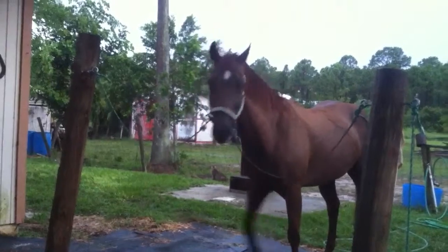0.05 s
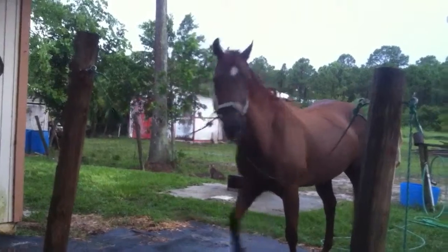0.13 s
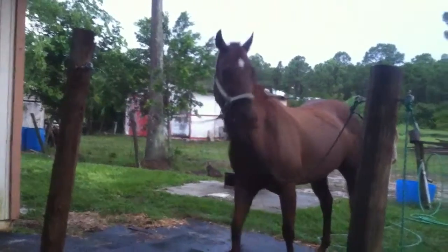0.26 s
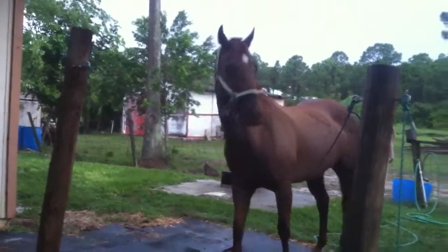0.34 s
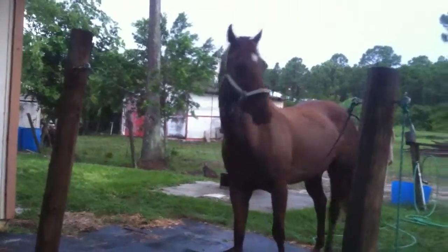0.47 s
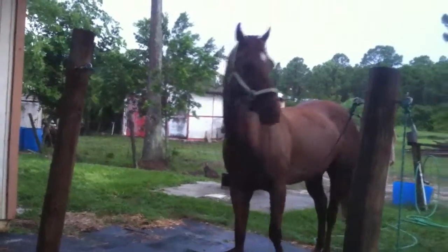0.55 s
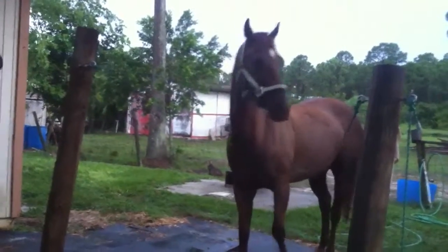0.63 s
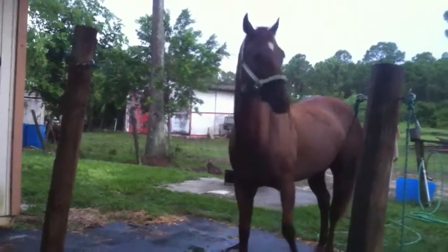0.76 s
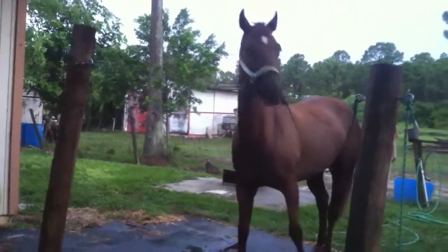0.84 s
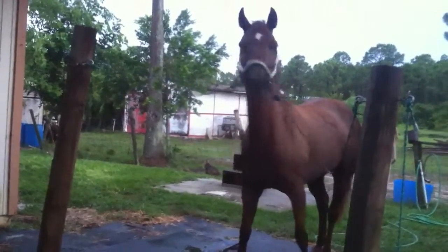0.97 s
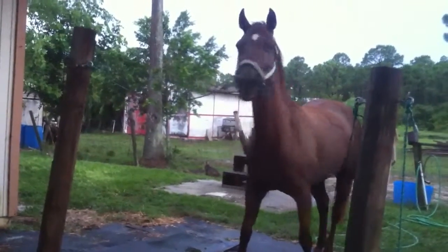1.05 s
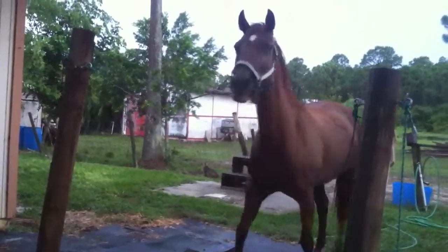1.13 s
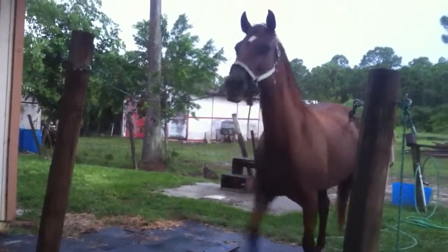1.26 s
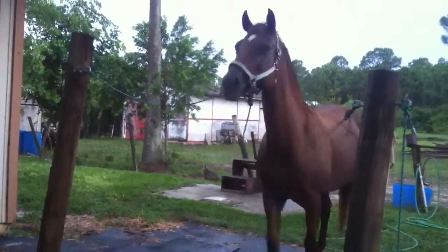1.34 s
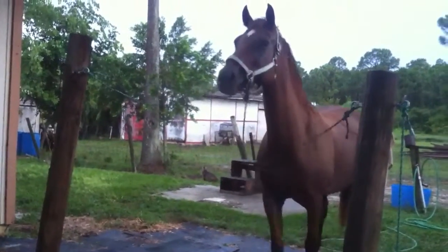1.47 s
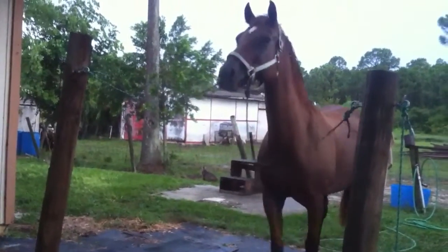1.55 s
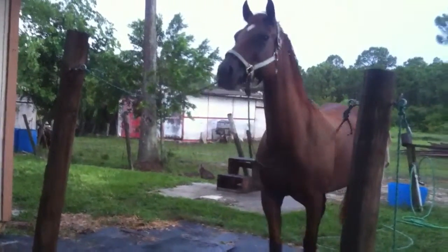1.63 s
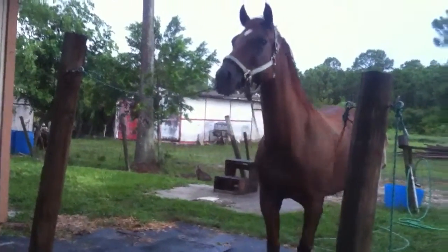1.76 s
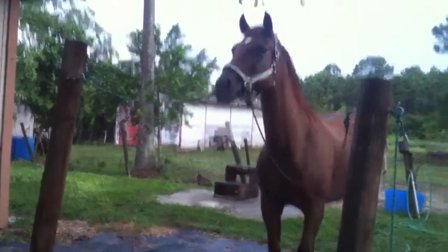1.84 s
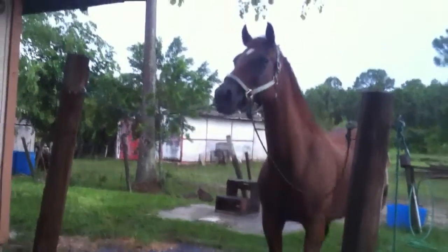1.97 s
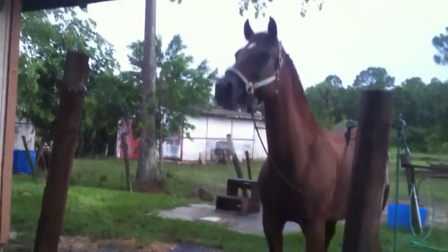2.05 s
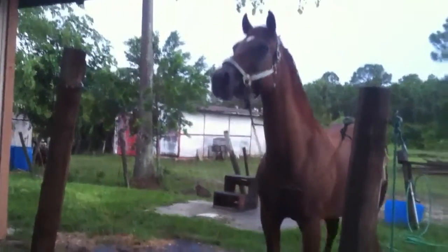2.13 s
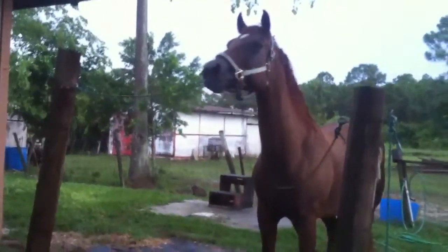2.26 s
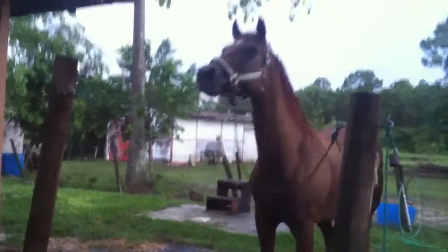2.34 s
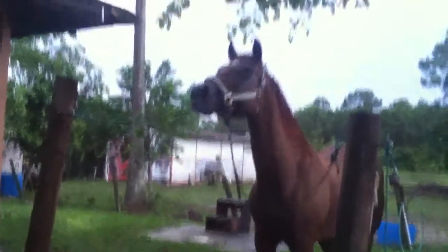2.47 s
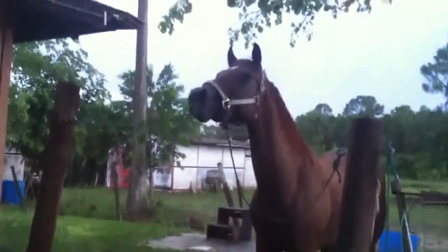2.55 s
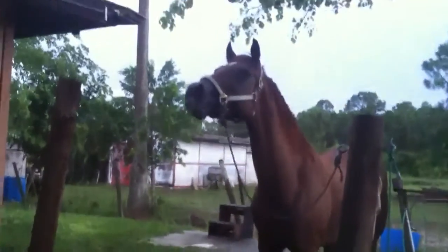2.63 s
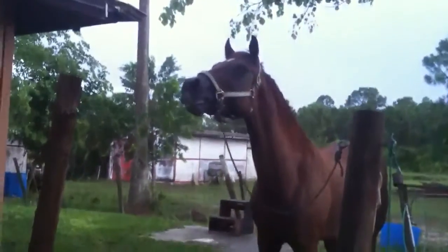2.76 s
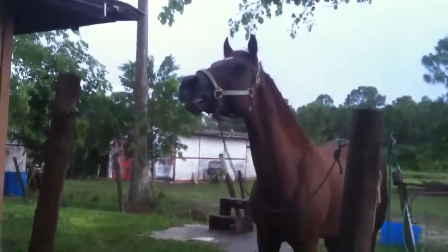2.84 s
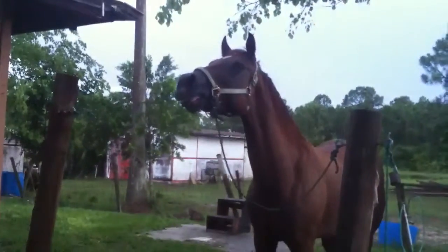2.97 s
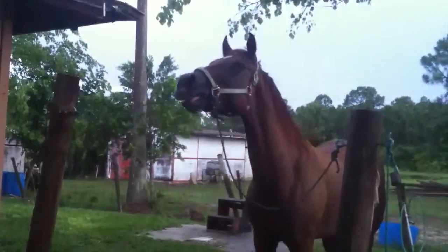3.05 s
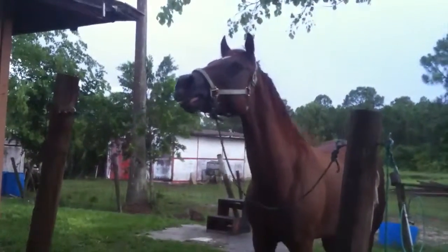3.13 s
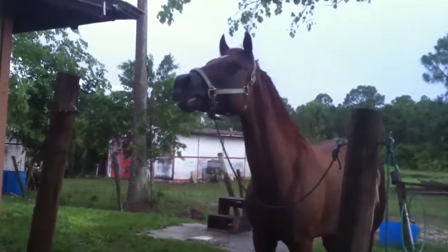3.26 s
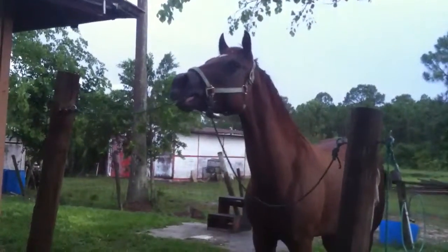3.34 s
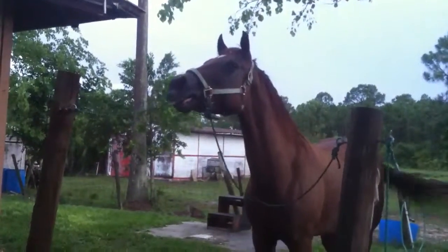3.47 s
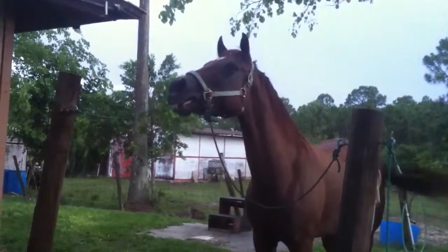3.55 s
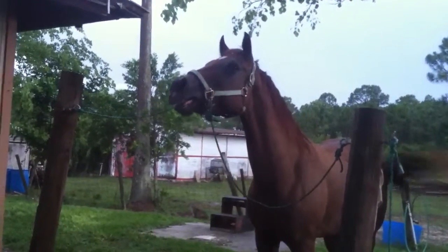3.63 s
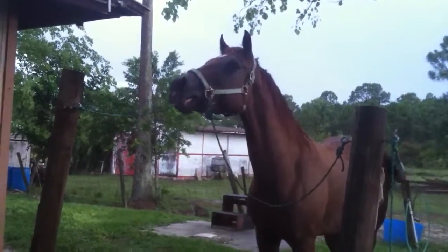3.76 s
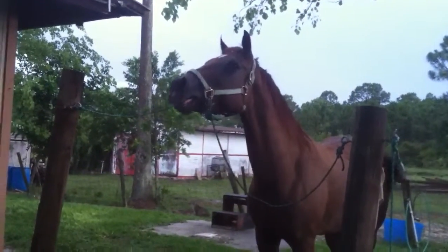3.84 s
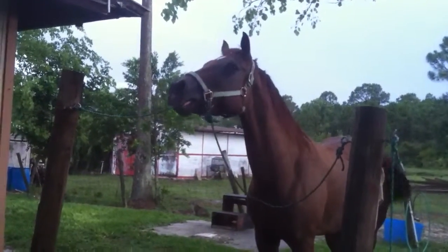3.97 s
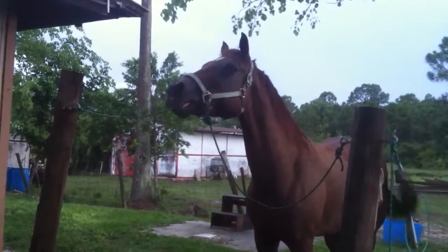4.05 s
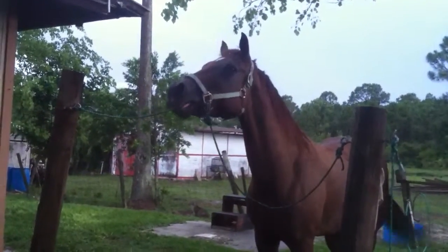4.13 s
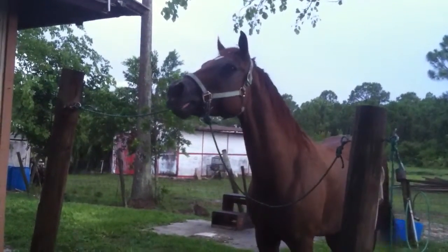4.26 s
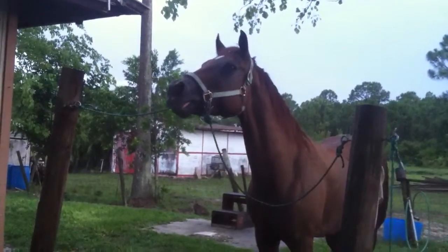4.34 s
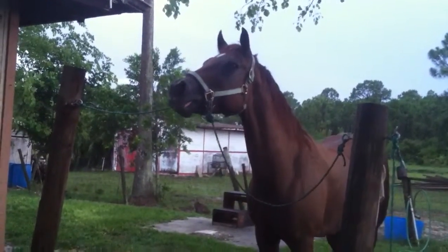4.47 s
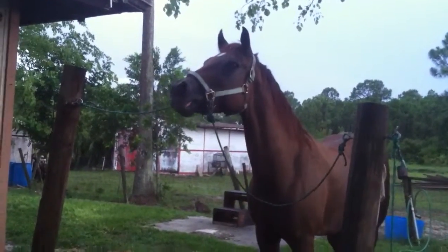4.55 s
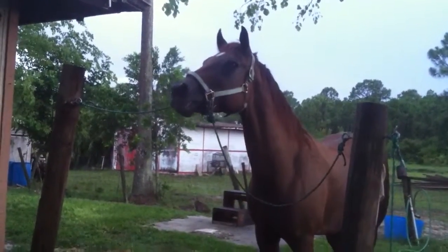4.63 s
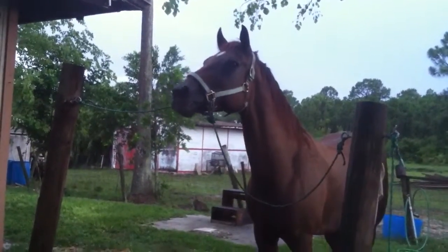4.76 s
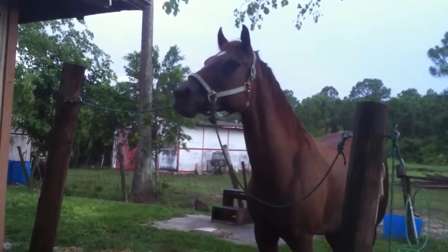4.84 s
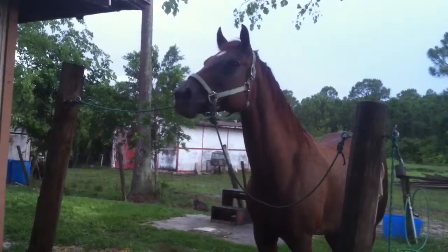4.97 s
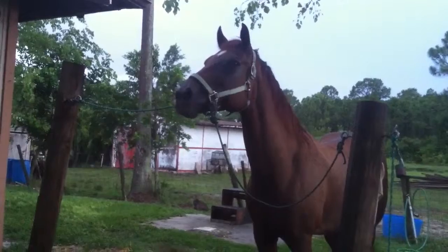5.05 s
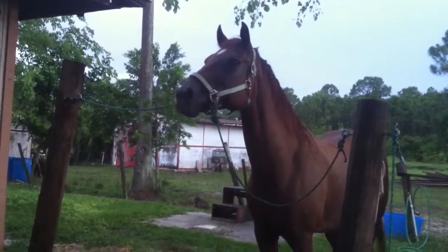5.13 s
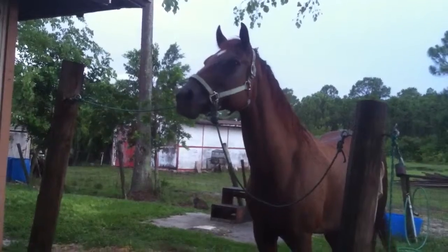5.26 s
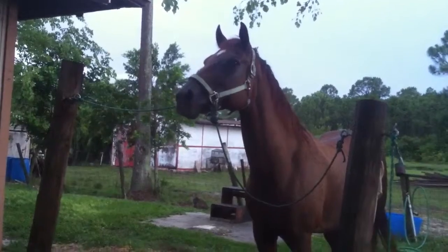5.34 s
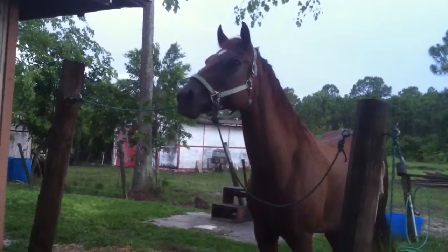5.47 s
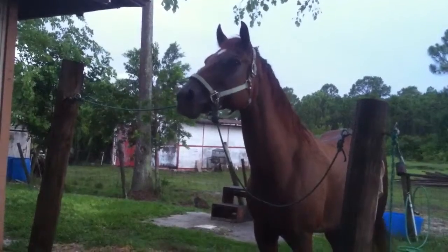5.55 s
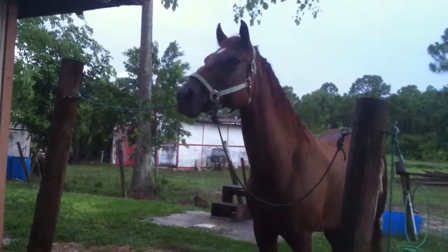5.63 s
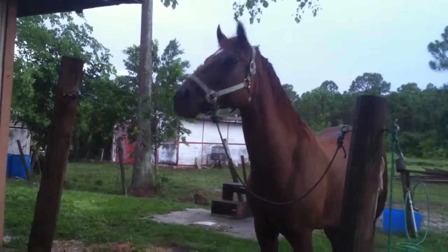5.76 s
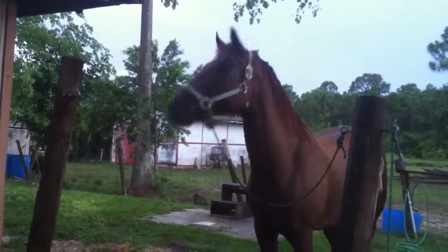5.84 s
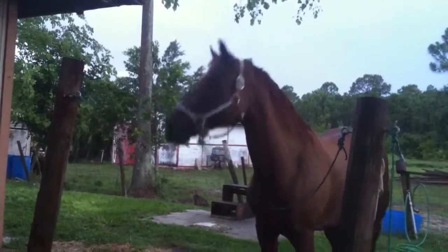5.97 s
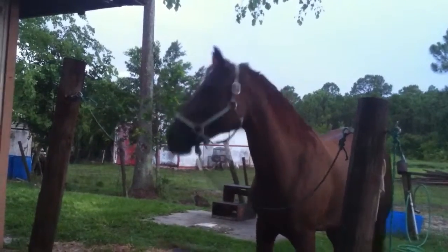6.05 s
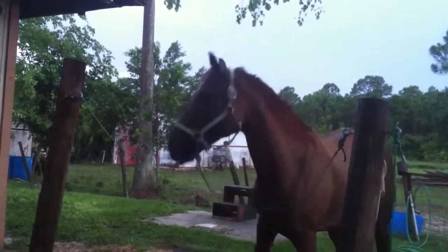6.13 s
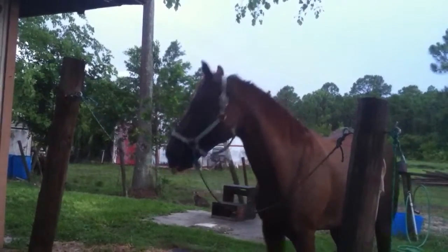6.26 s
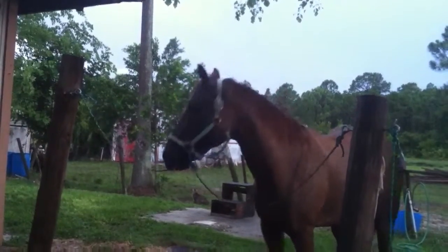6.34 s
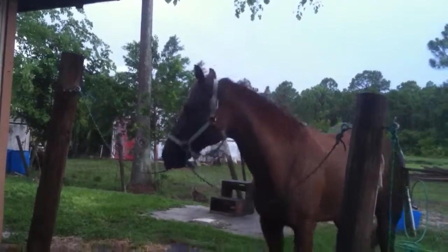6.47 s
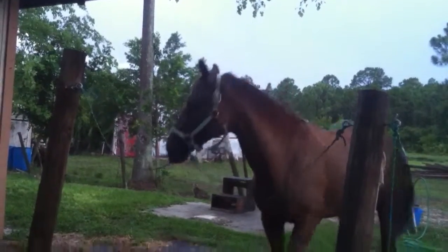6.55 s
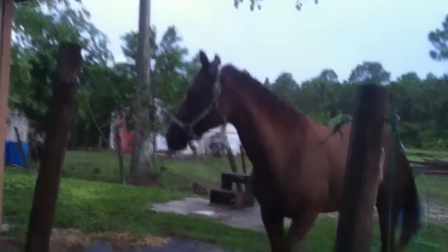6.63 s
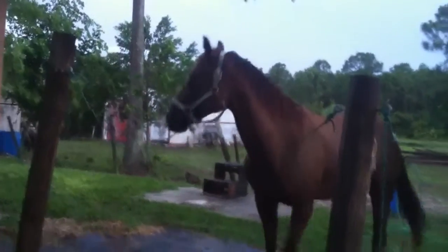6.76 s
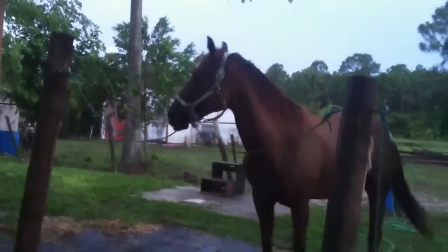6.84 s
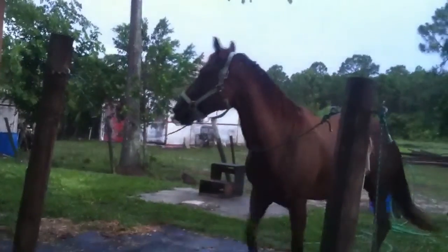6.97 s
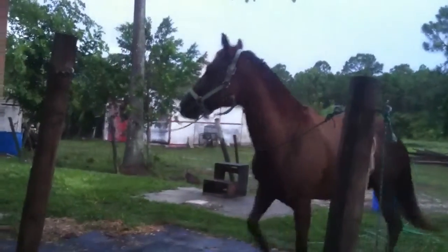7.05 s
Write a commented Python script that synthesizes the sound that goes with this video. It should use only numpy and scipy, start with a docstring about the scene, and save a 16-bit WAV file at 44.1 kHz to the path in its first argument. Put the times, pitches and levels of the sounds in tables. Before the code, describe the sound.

Faint frog and insect chorus, a few dull hoof thuds, then a piercing, quavering horse whinny ending in a rattling nicker, and later hoof steps.

```python
"""A far chorus of frogs and insects and a few hoof thuds, then a horse whinnies once, a few metres from the mic
beside a barn: a rising whistle breaks into a shaking two-voiced call and sinks into a hoarse nicker.
The high voice is a bent sine with overtones; the low voice is folds whose closures and air puffs ring throat and nose.
Hooves are knocks, decaying modes and scuffed noise; close clicks are snaps with thumps; the chorus is banded noise.
Crickets and birds are gliding tones; insects rasp in noise surges; barn echoes and a tree tail follow the horse."""
import sys
import numpy as np
from scipy import signal
from scipy.fft import rfft, irfft
from scipy.io import wavfile
from scipy.ndimage import uniform_filter1d

SR = 44100
rng = np.random.default_rng(int(sys.argv[2]) if len(sys.argv) > 2 else 0)


def wav_record(signal):
    """Record a signal, one row per channel, as 16-bit PCM in the file named by sys.argv[1]."""
    frames = np.transpose(np.atleast_2d(signal))
    bounded = np.clip(frames, -1, 1)
    # unit amplitude maps onto the largest positive 16-bit level
    quanta = np.round(bounded * 32767).astype(np.int16)
    wavfile.write(sys.argv[1], SR, quanta)


N = 313110
TIME = np.arange(N) / SR

# level of the whistle, rising and broken: (time [s], level [dB])
WHISTLE_LEVEL = [(2.2, -59.5), (2.238, -51), (2.248, -38.5), (2.275, -37.5), (2.29, -32.5), (2.318, -35.5),
                 (2.335, -27), (2.357, -34), (2.368, -23.5), (2.392, -18.5), (2.41, -22), (2.445, -25.5),
                 (2.47, -17.5), (2.52, -13.5), (2.8, -15), (3.1, -17), (3.35, -17.5), (3.65, -16),
                 (3.94, -24.5), (4.05, -33), (4.33, -54)]
# how far the high voice has broken up: (time [s], roughness [0-1])
ROUGHNESS = [(2.2, 0.29), (2.39, 0), (2.428, 0.33), (2.46, 0.28), (2.5, 0.57), (2.8, 0.77), (3.5, 0.75),
             (3.8, 0.84)]
# shakes of the call, about seven a second, levels before the dips: (time [s], low voice level [dB],
# throat level [dB], nostril hiss level [dB], half length [s], pitch sag [Hz])
SHAKES = [(2.562, -38, -27, -23.5, .038, 0), (2.684, -29.5, -26.5, -20.5, .04, 0),
          (2.814, -26, -26.5, -20, .042, 0), (2.951, -26, -27.5, -22, .045, 0),
          (3.095, -27, -26.5, -21.5, .043, 0), (3.237, -24.5, -26, -21, .047, 0),
          (3.38, -23.5, -26, -22.5, .045, 35), (3.522, -24, -25.5, -23, 0.0466, 58),
          (3.657, -24, -24.5, -22.5, 0.0452, 100), (3.797, -23, -24.5, -23.5, 0.0361, 105),
          (3.937, -22, -22.5, -24.5, 0.0366, -0.5), (4.057, -29.5, -26, -32.5, 0.0387, 45),
          (4.196, -32.5, -23.5, -31, 0.028, 15)]

# the rising whistle cracks, then jumps to its top note
CRACK_S, BREAK_S, JUMP_S = 2.434, 2.487, 0.011
# the folds tire, then the call sinks into a nicker
TIRE_S, NICKER_S, NICKER_ONSET_S = 3.26, 3.93, .12
# from here the droop between shakes gives way to a sag just after each push
SAGGING_S, SAGGING_ONSET_S = 3.25, .15


def undb(db):
    """Decibels to gain."""
    return 10 ** (np.asarray(db) / 20)


def unit(x):
    """Scale to rms 1."""
    return x / np.sqrt(np.mean(x ** 2) + 1e-18)


def steady(x):
    """Hold the rms at 1 over a fifth of a second."""
    return x / np.sqrt(uniform_filter1d(x ** 2, size=8820) + 1e-12)


def curve(rows):
    """Join (time [s], value) rows by straight lines."""
    return np.interp(TIME, *np.transpose(rows))


def window(start, end, fade):
    """1 between two times, with sloping edges inside them."""
    return np.clip(np.minimum(TIME - start, end - TIME) / fade, 0, 1)


def ramp(start, length):
    """0 before a time, rising to 1 over a length."""
    return np.clip((TIME - start) / length, 0, 1)


def swell(at, rise, fall, squareness=2):
    """A smooth hump of height 1."""
    return np.exp(-np.minimum(np.abs((TIME - at) / np.where(TIME < at, rise, fall)), 5) ** squareness)


def loudness(rows):
    """Gain from (time [s], level [dB]) rows, silent outside them."""
    return undb(curve(rows)) * window(rows[0][0], rows[-1][0], 0.005)


def delayed(control, lag):
    """A control that runs lag seconds late."""
    return np.interp(TIME - lag, TIME, control)


def noise():
    """White noise."""
    return rng.standard_normal(N)


def walk(rate):
    """Smooth random motion of spread 1, up to about rate Hz."""
    hz = np.arange(N // 2 + 1) * SR / N
    return unit(irfft(rfft(noise()) * np.exp(-(hz / rate) ** 2 / 2), N))


def turning(hz):
    """Phase of an oscillator that follows a pitch."""
    return 2 * np.pi * np.cumsum(hz) / SR


def colour(x, points):
    """Filter by a (frequency [Hz], level [dB]) spectrum that falls away beyond its ends."""
    hz, db = np.transpose(points)
    octave = np.log2(np.maximum(np.arange(N // 2 + 1) * SR / N, 1))
    beyond = np.abs(octave - np.clip(octave, np.log2(hz[0]), np.log2(hz[-1])))
    gain = undb(np.interp(octave, np.log2(hz), db) - 89 * beyond)
    return irfft(rfft(x) * gain, N)


def resonate(x, hz, width):
    """A steep resonance of gain 1: the same peak filter twice."""
    b, a = signal.iirpeak(hz, hz / width, fs=SR)
    return signal.lfilter(b, a, signal.lfilter(b, a, x))


def ring(x, modes):
    """Drive a set of (frequency [Hz], width [Hz], level [dB]) resonances of alternating sign."""
    return sum((-1) ** k * undb(db) * resonate(x, hz, width) for k, (hz, width, db) in enumerate(modes))


def lowpass(x, hz):
    """Second-order low-pass."""
    return signal.sosfilt(signal.butter(2, min(hz, SR / 2 - 1), fs=SR, output="sos"), x)


def decay(t, t60):
    """A fall of 60 dB in t60 seconds."""
    return np.exp(-np.log(1000) * t / t60)


def add(out, start, sound):
    """Mix a short sound in at a time."""
    i = max(int(start * SR), 0)
    out[i:i + len(sound)] += sound[:max(N - i, 0)]


def chorus(low_db=0.73, high_db=-55.5, air_db=-57.0):
    """Countless far frogs and insects blur into two bands of noise over soft outdoor air."""
    # spectra of the two bands and of the air: (frequency [Hz], level [dB])
    low_colour = [(700, -34), (1150, -34.5), (1450, 3.5), (1650, 3), (1900, -0.5), (2300, -7),
                  (2900, -18.5), (3600, -25)]
    high_colour = [(2000, -36), (2800, -8.5), (3500, -5.5), (4050, 2), (4450, -6), (4900, -25),
                   (5900, -25.5), (7500, -23.5), (8500, -22.5), (9200, -28), (9700, -56), (13000, -48)]
    air_colour = [(25, 1), (60, -9), (120, -3.5), (280, 0.5), (480, -4.5), (750, -11.5), (1300, -6),
                  (3000, -12), (10000, -34)]
    # swell of the low band, before its trim and the lull: (time [s], level [dB])
    low_level = np.vstack([ [(0.0, -48), (0.17, -59.5), (0.17, -56.5), (0.66, -48.5), (0.75, -62.5),
                 (0.94, -54), (1.63, -51), (1.78, -60), (1.82, -56.5), (2.15, -49)], [(4.5, -55),
                 (4.51, -56), (5.2, -51.5), (5.75, -53.5), (5.85, -49), (5.97, -56.5), (6.14, -48),
                 (6.31, -58.5), (6.5, -52), (6.7, -50)], ])
    # nearer groups of callers: (frequency [Hz], width [Hz], level against the whole chorus [dB])
    callers = [(1615, 160, -15.5), (1673, 81, -4.5), (1828, 35, -9.5), (3490, 520, -8), (3730, 490, -8),
               (4000, 860, -14.5)]
    lull = ramp(6.68, 0.076)  # the chorus ebbs at the end
    low_swell = curve(low_level) - 10.5 * lull
    high_swell = high_db - 4.5 * lull
    low = unit(colour(noise(), low_colour)) * undb(low_swell + low_db + 0.84 * walk(25))
    high = unit(colour(noise(), high_colour)) * undb(high_swell + 0.61 * walk(30))
    # the groups come and go, each in its own band
    groups = sum(unit(resonate(noise(), hz, width)) * undb(db + 3 * walk(4)) for hz, width, db in callers)
    groups = groups * undb((low_swell + high_swell) / 2)
    air = unit(colour(noise(), air_colour)) * undb(air_db + 0.48 * walk(6.2))
    return low + high + groups + air


def rasping_insects():
    """Insects in the trees rasp together in soft surges of narrow-band noise."""
    # (time [s], half length [s], frequency [Hz], width [Hz], level [dB])
    surges = [(0.298, 0.15, 3880, 700, -51.5), (0.562, 0.17, 3700, 1250, -51.5),
              (0.946, .08, 4050, 800, -51), (1.238, .09, 3770, 1160, -48.5), (1.62, 0.1, 3840, 1250, -51),
              (1.92, 0.058, 4070, 700, -57), (2.17, 0.11, 3900, 1000, -53), (4.577, 0.14, 4100, 880, -56),
              (5.037, 0.095, 3940, 803, -52), (5.3, 0.14, 3880, 900, -61), (5.61, 0.098, 3900, 800, -52),
              (5.866, .12, 3900, 1300, -55.5), (6.16, 0.1, 3880, 900, -51), (6.44, 0.26, 3880, 1100, -56.5)]
    return sum(unit(resonate(noise(), hz, width)) * undb(db) * swell(at, half, half)
               for at, half, hz, width, db in surges)


def birds():
    """Faint calls from the woods: wavering tones that glide from one pitch to another."""
    # (start [s], end [s], first pitch [Hz], last pitch [Hz], level [dB], waver [share of pitch])
    calls = [(0.796, 1.014, 705, 650, -57, 0.045), (5.077, 5.269, 1224, 1390, -50, 0.041),
             (5.12, 5.28, 2810, 2960, -51, 0.038), (6.95, 7.144, 687, 680, -60.5, .02)]
    out, waver = np.zeros(N), walk(156)
    for start, end, first_hz, last_hz, db, share in calls:
        hz = np.interp(TIME, [start, end], [first_hz, last_hz]) * (1 + share * waver)
        out += undb(db) * window(start, end, 0.04) * np.sin(turning(hz))
    return out


def crickets(waver=.003, scratch_db=3.5, level_db=-3):
    """Two crickets chirp by turns; each wing stroke is a pure tone, and the first cricket's drops as it ends."""
    # chirps of the first cricket, before the trim: (start [s], level [dB])
    chirps = [(0, -62), (.56, -62.5), (1.25, -63.5), (1.86, -63), (4.43, -64), (4.88, -65.5), (5.33, -65),
              (5.83, -65), (6.31, -65), (6.82, -72.5)]
    strokes_per_s = 20
    # (pitch [Hz], drop within a stroke [Hz], lag [s], level [dB], strokes)
    singers = [(6590, 350, 0, 0, 5), (6330, 0, 0.33, -5.5, 4)]
    out, t = np.zeros(N), TIME[:int(SR / strokes_per_s)]
    stroke = t * strokes_per_s
    for start, db in chirps:
        for hz, drop_hz, lag, own_db, strokes in singers:
            for k, (detune, size) in enumerate(rng.standard_normal((strokes, 2))):
                tone = np.sin(turning(hz * (1 + waver * detune) - drop_hz * stroke ** 4))
                tone *= np.sin(np.pi * stroke)
                add(out, start + lag + k / strokes_per_s, tone * undb(db + own_db + 2.4 * size))
    return out * undb(level_db + scratch_db * walk(120))


def hooves(scuff_db=5.5, scuff_t60=0.14, knock_t60=0.0071, knock_hz=660):
    """Each hoof knocks, thuds on the ground with decaying modes and scuffs the dirt with noise."""
    # (time [s], level before trim [dB], base ring [Hz], relative scuff [dB], relative knock [dB])
    hoof_falls = [(0.343, -37, 530, -11.5, -11), (0.353, -42, 420, -23, -14), (0.377, -28.5, 245, -37, 0),
                  (0.583, -39, 258, -16, -10), (0.631, -47.5, 262, -13, -8), (1.385, -34, 270, -23, -14),
                  (1.423, -33.5, 440, -13.5, 0), (1.748, -45, 554, -10.5, -18), (1.981, -41, 251, -19, 2),
                  (2.013, -48, 300, -20, -6), (2.121, -36.5, 444, -11.5, -8), (2.145, -34, 231, -11.5, -9),
                  (6.218, -33.5, 436, -15.5, -1), (6.36, -28, 450, -15.5, -1), (6.455, -45.5, 149, -15, 3),
                  (6.717, -43, 323, -4.5, -6), (6.904, -28.5, 302, -22.5, -16)]
    # ring of a hoof on the ground: (multiple of its base ring, fall by 60 dB [s], level [dB])
    hoof_modes = [(.58, 0.018, -4.5), (1.001, 0.024, 10), (1.35, 0.02, -21), (2.301, 0.027, -9.5),
                  (3.6, 0.0078, -4)]
    thuds, scuffs, t = np.zeros(N), np.zeros(N), TIME[:SR // 4]
    for start, db, hz, grit_db, knock_db in hoof_falls:
        thud = sum(undb(d) * decay(t, t60) * np.sin(2 * np.pi * hz * k * t) for k, t60, d in hoof_modes)
        thud *= np.minimum(t * hz, 1)  # the blow builds over one cycle
        knock = undb(knock_db) * decay(t, knock_t60) * np.sin(2 * np.pi * knock_hz * t)
        add(thuds, start + 0.0014, undb(db + 3.5) * (thud / np.abs(thud).max() + knock))
        add(scuffs, start + 0.0011, undb(db + grit_db + scuff_db) * decay(t, scuff_t60))
    dirt_colour = [(140, 1.0), (500, 5.0), (800, -6), (1150, -2.0), (2400, -19.0), (5000, -36.0)]
    return lowpass(thuds, 2500) + scuffs * unit(colour(noise(), dirt_colour))


def clicks(snap_t60=0.0078, thump_t60=0.016, tick_db=12.0, thump_lag_s=0.0014, dull_hz=10500):
    """Close to the mic, a hard snap of noise with a short, hollow thump behind it."""
    # (time [s], snap drive [dB], snap cut-off [Hz], thump drive [dB], thump pitch [Hz])
    snaps = [(6.7903, -9, 6600, -9.5, 230), (6.816, -15.5, 2850, -18.5, 450), (6.8231, -53, 9000, -35, 297)]
    out, t = np.zeros(N), TIME[:SR // 10]
    for start, snap_db, snap_hz, thump_db, thump_hz in snaps:
        snap = .5 * rng.standard_normal(len(t)) * decay(t, snap_t60)
        snap[0] = -2 * undb(tick_db)  # one strong first sample
        thump = np.sin(2 * np.pi * thump_hz * t) * decay(t, thump_t60)
        thump *= np.minimum(2 * t * thump_hz, 1)
        add(out, start, undb(snap_db) * lowpass(lowpass(snap, snap_hz), dull_hz))
        add(out, start + thump_lag_s, undb(thump_db) * thump)
    return out


def tiredness():
    """0 while the call is fresh, 1 when it reaches the nicker."""
    return ramp(TIRE_S, NICKER_S - TIRE_S)


def nicker():
    """0 in the high call, 1 in the closing nicker."""
    return ramp(NICKER_S, NICKER_ONSET_S)


def call_gate(range_db=30):
    """Attack, hold and release of the broken call."""
    open_s, attack_s, close_s, release_s = 2.52, 0.076, 4.275, 0.093
    before, after = (open_s - TIME) / attack_s, (TIME - close_s) / release_s
    outside = np.maximum(before, 0) + np.maximum(after, 0)
    return undb(-range_db * np.minimum(outside, 6))


def shaking(squareness=2.6):
    """Push of air: 1 at the height of each shake, near 0 between them."""
    return sum(swell(at, half, half, squareness) for at, *_, half, _ in SHAKES)


def shake_level(column):
    """One level column of the shakes, joined from shake to shake (dB)."""
    return curve([(row[0], row[column]) for row in SHAKES])


def grunting(column):
    """How far the separate grunts lift one part of the nicker (dB)."""
    # (time [s], half length [s], throat lift [dB], low voice lift [dB])
    grunts = [(3.991, 0.0058, -3, 10), (4.025, 0.012, 7, 3), (4.057, 0.011, 1, 3), (4.083, 0.011, 7, 6.5),
              (4.105, 0.0077, 4.5, 3), (4.142, 0.023, -0.5, 7), (4.16, 0.011, 5, -1), (4.2, 0.021, 2, 0),
              (4.266, 0.026, 2.5, 7.5)]
    return sum(row[column] * swell(row[0], row[1], row[1]) for row in grunts)


def voice_level(push, dip_db=16, lag_s=0.0085, smoothing=0.97):
    """Level of the low voice in dB: each shake's strength, with dips between and a rebound after each sag."""
    rebound_lag_s, rebound_length_s, rebound_per_hz = 0.057, 0.0078, 0.0079
    rebound = sum(rebound_per_hz * sag_hz * swell(at + rebound_lag_s, rebound_length_s, rebound_length_s)
                  for at, *_, sag_hz in SHAKES if sag_hz)
    # the voice starts later as the folds tire; its dips nearly vanish in the nicker
    dip = 1 - delayed(push, lag_s * tiredness()) - rebound
    dip = dip * (1 - smoothing * nicker())
    return shake_level(column=1) - dip_db * dip + grunting(column=3)


def rasp_levels(push, throat_lag_s=0.014, hiss_lead_s=0.0038, grunt_hiss_share=0.41):
    """Gains of the hoarse throat and of the nostril hiss; both pulse with the shakes and grunts, the hiss first."""
    throat_db, hiss_db, grunt_db = shake_level(column=2), shake_level(column=3), grunting(column=2)
    # the tiring throat rasps behind the push, and dips deeper in the nicker
    throat_push = delayed(push, throat_lag_s * tiredness() * (1 - nicker()))
    throat_dip = (6 + 5 * nicker()) * (1 - throat_push)
    # the hiss dips less as the horse tires
    hiss_dip = (6.5 - 3 * tiredness()) * (1 - delayed(push, -hiss_lead_s))
    return undb(throat_db - throat_dip + grunt_db), undb(hiss_db - hiss_dip + grunt_hiss_share * grunt_db)


def fold_phase(push, voice_hz=264.6, droop_hz=47.93, tired_drop_hz=8, jitter=.032, nicker_jitter=.015):
    """Cycle of the vocal folds: drooping between pushes, later sagging after them, lurching in the nicker."""
    # the low voice lurches through the nicker: (time [s], pitch before jitter [Hz])
    nicker_pitch = [(3.92, 265.9), (3.94, 240.3), (3.965, 164.5), (3.988, 265.7), (4.015, 189.8),
                    (4.045, 268.4), (4.08, 185.4), (4.1, 245.1), (4.135, 230.6), (4.155, 265.1),
                    (4.195, 159.6), (4.25, 212.3), (4.3, 197.2)]
    sag_lag_s, sag_lag_s_per_hz, sag_length_s = .009, .0002, .022  # deeper sags come later
    droop = droop_hz * (1 - push) * (1 - ramp(SAGGING_S, SAGGING_ONSET_S))
    sag = sum(sag_hz * swell(at + sag_lag_s + sag_lag_s_per_hz * sag_hz, sag_length_s, sag_length_s)
              for at, *_, sag_hz in SHAKES if sag_hz)
    shaken = voice_hz - tired_drop_hz * tiredness() - droop - sag
    hz = np.where(TIME < nicker_pitch[0][0], shaken, curve(nicker_pitch))
    return turning(hz * (1 + (jitter + nicker_jitter * nicker()) * walk(77.5)))


def creak(folds, creak_db=2.5):
    """In the nicker the strength of the slack folds swells once in three cycles, so the voice rattles."""
    return undb(creak_db * nicker() * np.cos(folds / 3))


def low_voice(folds, voice_db, second_db=-21, third_db=-28, shimmer_db=2.0, open_db=9, level_db=-1.5):
    """The round tone of the folds; its octave grows as they slacken, and an undertone joins in the nicker."""
    octave = undb(second_db + open_db * tiredness()) * np.sin(2 * folds)
    tone = np.sin(folds) + octave + undb(third_db) * np.sin(3 * folds)
    tone += undb(-12.5) * nicker() * np.sin(2 * folds / 3)  # undertone
    tone = steady(tone * creak(folds) * undb(shimmer_db * walk(36)))
    return tone * undb(voice_db + level_db) * call_gate()


def rasp(folds, push, voice_db, scatter_db=0.5, nose_db=-4.5, hiss_db=-6.0, flap_db=7.0):
    """The folds slap shut once a cycle and let out a puff of air; both ring the throat and the nose."""
    # throat resonances: (frequency [Hz], width [Hz], weight in the high call [dB], weight when slack [dB])
    throat_modes = [(422, 114, -5, 8.5), (517, 140, -4, 3), (713, 470, -6, 0.5), (980, 192, 3.5, 4.5),
                    (1139, 132, -0.5, 10), (1334, 280, 0, -2), (1422, 130, 2, 3.5), (1585, 100, 9, 5.5),
                    (1765, 97, 11, 3.5), (1990, 220, 7, 10.5), (2182, 47, 14, -34), (2315, 46, -4, 3)]
    # narrow resonances of the long nasal passages: (frequency [Hz], width [Hz], weight [dB])
    nose_modes = [(2460, 60, 3.5), (2727, 170, 4.5), (3128, 83, -5), (3865, 127, 1.5), (4177, 51, -0.5),
                  (4370, 120, -2), (5124, 55, -11), (5940, 330, -9), (6430, 68, -12.5), (6980, 156, -10)]
    # spectrum of the nostril hiss: (frequency [Hz], level [dB])
    hiss_colour = [(1290, -15), (2200, -6.5), (2440, -7), (3150, -7), (3550, -6.5), (3970, -14.5),
                   (4300, -14), (4710, -14.5), (5840, -15.5), (7200, -26), (7880, -46.5), (10200, -42),
                   (12200, -73), (13100, -87)]
    # side cavities swallow narrow bands: (frequency [Hz], width [Hz])
    notches = [(830, 77), (1490, 53), (1885, 14), (2400, 78), (3570, 160), (5400, 190), (6760, 84)]
    slap_db, puff_db = 0, 4  # closures against the puffs; how strongly each cycle gates the air
    leak_db = -28.5  # air around the whistle, against the whistle
    crack_db, crack_rise_s, crack_fall_s = -31, 0.013, 0.018

    closures = np.diff(np.floor(folds / (2 * np.pi)), prepend=0) * undb(2 * noise())
    uneven = undb(scatter_db * walk(180))
    air = unit(noise() * undb(puff_db * np.cos(folds))) * uneven
    drive = (air + undb(slap_db) * unit(closures) * uneven) * creak(folds)
    drive = steady(drive)
    throat_gain, hiss_gain = rasp_levels(push)
    # the throat relaxes towards the end and favours its low resonances
    slack = (tiredness() + nicker()) / 2
    modes = [(hz, width, tense_db + slack * (slack_db - tense_db))
             for hz, width, tense_db, slack_db in throat_modes]
    throat = steady(ring(drive, modes)) * throat_gain * undb(5.5 - 3.7 * slack)
    nose = undb(nose_db) * unit(ring(drive, nose_modes)) + undb(hiss_db) * unit(colour(drive, hiss_colour))
    # air spits past the lips and the loose folds flap as the voice gives out
    spit_colour = [(5000, -8.0), (8000, 4.5), (10500, -5.5), (13000, -22.0)]
    spit = unit(colour(air, spit_colour)) * undb(-30.5 + 9.4 * slack)
    spit = spit * undb(0.15 * (voice_db + 28.0))
    flap = unit(resonate(drive, 251, 160)) * undb(flap_db - 12.0 * (2.5 - slack))
    out = (throat + (nose + spit) * hiss_gain + flap * undb(voice_db)) * call_gate()
    # a little air already leaks around the rising whistle, with a puff where it cracks
    leak = undb(leak_db) * loudness(WHISTLE_LEVEL) * (1 - ramp(BREAK_S, JUMP_S))
    leak += undb(crack_db) * swell(CRACK_S, crack_rise_s, crack_fall_s)
    leak_colour = [(450, -7.5), (1200, -14.0), (2000, 0.0), (3500, -4.5), (6300, -1), (8000, -17),
                   (10000, -19.5), (13000, -47)]
    out += unit(colour(air, leak_colour)) * leak
    for hz, width in notches:
        out = signal.lfilter(*signal.iirnotch(hz, hz / width, fs=SR), out)
    return out


def nostrils(whistle_width_hz=70):
    """A thin nostril whistle on the last shake, then the horse draws air in a short rising gasp."""
    whistle_s, whistle_length_s, whistle_hz, whistle_db = 4.232, 0.034, 4410, -41.5
    gasp_s, gasp_length_s, gasp_db = 4.365, 0.017, -44
    gasp_hz, gasp_rise_hz_per_s, gasp_width_hz = 2210, 8400, 200
    thin = unit(resonate(noise(), whistle_hz, whistle_width_hz)) * undb(whistle_db)
    thin *= swell(whistle_s, whistle_length_s, whistle_length_s)
    # two random walks on sine and cosine make a band of noise that slides up
    phase = turning(gasp_hz + gasp_rise_hz_per_s * (TIME - gasp_s))
    gasp = walk(gasp_width_hz) * np.cos(phase) + walk(gasp_width_hz) * np.sin(phase)
    return thin + gasp * undb(gasp_db) * swell(gasp_s, gasp_length_s, gasp_length_s)


def squawks(folds, wobble=.028, chop=0.33, flutter_db=2.0):
    """The tiring call catches for a moment on throat resonances: brief wobbling tones chopped by the folds."""
    # (time [s], half length [s], centre pitch [Hz], level before chop and flutter [dB])
    catches = [(3.585, .018, 1780, -22), (3.655, 0.022, 1660, -21.5), (3.751, 0.036, 1562, -20),
               (3.765, 0.034, 1780, -23.5), (3.907, .022, 1793, -18.5), (3.93, 0.025, 1580, -21),
               (4.053, 0.022, 1090, -29), (4.192, 0.031, 1118, -24)]
    out = 0
    for at, half, hz, db in catches:
        phase = turning(hz * (1 + wobble * walk(120.7)))
        out = out + undb(db) * swell(at, half, half) * np.sin(phase)
    return out * (1 + chop * np.cos(folds)) * undb(flutter_db * walk(90))


def whistle_tone(phase, fall_db, flicker_db):
    """A whistle with flickering overtones, coloured by the head and held near rms 1."""
    # spectrum of the head: (frequency [Hz], level [dB])
    head_colour = [(900, -7.5), (1500, -4.5), (2050, 9), (2400, -17.5), (3000, 6.5), (3550, 6.5),
                   (4500, -1), (5150, 8), (5500, -0.5), (6000, 7), (6600, -6.5), (7200, -2), (7900, -7),
                   (8700, -4.5), (9400, -15.5), (13000, -39)]
    overtones = sum(undb(flicker_db * walk(28) - fall_db * np.log2(k)) * np.sin(k * phase)
                    for k in range(2, 7))
    tone = colour(np.sin(phase) + overtones, head_colour)
    return tone / np.sqrt(uniform_filter1d(tone ** 2, size=1323) + 1e-6)


def squeal(folds, wobble=.03, fray=0.0032, drag=0.75, flutter_db=4.5, fall_db=9.0, flicker_db=4.0, fade_s=0.04):
    """The opening whistle climbs, cracks as the slow folds stir, and dies under the top note."""
    # the climb until the break, before wobble: (time [s], pitch [Hz])
    whistle_rise = [(2.21, 1086), (2.245, 1310), (2.262, 1444), (2.29, 1517), (2.315, 1547), (2.335, 1630),
                    (2.365, 1773), (2.388, 1795), (2.405, 1713), (2.43, 1578), (2.465, 1800), (2.51, 1828)]
    rough = curve(ROUGHNESS)
    hz = curve(whistle_rise) * (1 + wobble * rough * walk(147) + fray * walk(283))
    phase = turning(hz) + drag * rough * np.sin(folds)
    flutter = undb(flutter_db * np.sqrt(rough) * walk(75))
    # after the crack the overtones thin out (dB per octave)
    slope_db = fall_db + 6 * ramp(CRACK_S, BREAK_S - CRACK_S)
    tone = whistle_tone(phase, slope_db, flicker_db) * flutter
    return tone * loudness(WHISTLE_LEVEL) * (1 - ramp(BREAK_S, fade_s))


def top_note(folds, push, drag=0.24, chop=0.47, flutter_db=2.5, fall_db=21.5, flicker_db=4.5):
    """The high voice: purer between pushes; each push splits it, and the slow folds bend and chop it."""
    # the note catches between some shakes: (time [s], half length [s], depth [dB])
    catches = [(2.597, 0.0051, 12), (2.851, 0.0099, 10), (3.01, 0.025, 9.5), (3.164, 0.026, 1.5),
               (3.43, .015, 6.5), (3.559, 0.025, 13.5), (3.692, 0.019, 12), (3.823, 0.016, 7)]
    # it starts sharp, settles, and lifts with every shake
    note_hz, overshoot_hz, settle_s, lift_hz = 1982, 99.88, .2, 15
    calm_share, wobble, fray = .45, .016, .01
    split_hz, split_db = 140, -5
    tremor_hz, tremor_share = 55, .25
    linger_db, linger_fall_db_per_s = -32, 4
    lead_s = 0.03  # later the pitch lift comes ahead of each push

    rough = np.clip(curve(ROUGHNESS) * (calm_share + push), 0, 1.3)
    since = np.maximum(TIME - BREAK_S, 0)
    lead = delayed(push, -lead_s * ramp(SAGGING_S, SAGGING_ONSET_S) * (1 - nicker()))
    hz = note_hz + overshoot_hz * np.exp(-since / settle_s) + lift_hz * lead
    hz = hz * (1 + rough * (wobble * walk(148) + fray * walk(283)))
    phase = turning(hz) + drag * rough * np.sin(folds)
    # under pressure a second tone splits off above the note
    split_phase = phase + turning(split_hz * (1 + 0.1985 * walk(30.1)))
    split = undb(split_db) * rough * (1 - tiredness()) * np.sin(split_phase)
    # a tone at three times the pitch lingers on the pushes and slowly fades
    linger = push * undb(linger_db - linger_fall_db_per_s * since) * np.sin(3 * phase)
    # the whole note trembles
    tremor = 1 + tremor_share * np.cos(turning(tremor_hz * (1 + 0.237 * walk(25))))
    beat = (1 + chop * rough * np.cos(folds)) * tremor * undb(flutter_db * walk(75))
    tone = steady((whistle_tone(phase, fall_db, flicker_db) + split + linger) * beat)
    dip_db = sum(db * swell(at, half, half) for at, half, db in catches)
    return tone * loudness(WHISTLE_LEVEL) * undb(-dip_db) * ramp(BREAK_S, JUMP_S)


def yard(x, tail_db=-25, tail_t60=0.59, build_s=0.19):
    """A few echoes off the barn and an airy noise tail from the trees, added to the direct sound."""
    # echoes from the barn: (delay [s], level [dB])
    echoes = [(.0092, -15), (0.0223, -11), (0.033, -15.5)]
    # what the trees scatter back: (frequency [Hz], level [dB])
    tail_colour = [(150, -2), (500, -5), (800, 6), (1200, -8), (2400, 1.5), (6000, -7)]
    t = TIME[:SR]
    tail = colour(noise(), tail_colour)[:SR] * decay(t, tail_t60) * np.minimum(t / build_s, 1) ** 2
    response = undb(tail_db) * tail / np.linalg.norm(tail)
    response[0] = 1
    for delay, db in echoes:
        response[int(delay * SR)] += undb(db)
    return signal.fftconvolve(x, response)[:N]


def scene(hoof_echo_share=0.58, voice_echo_share=0.46):
    """The horse in its yard, woods behind; only part of the low voice and hoof falls feeds the echoes."""
    push = shaking()
    folds, voice_db = fold_phase(push), voice_level(push)
    call = squeal(folds) + top_note(folds, push) + squawks(folds) + rasp(folds, push, voice_db) + nostrils()
    voice, steps = low_voice(folds, voice_db), hooves()
    horse = yard(call + voice_echo_share * voice + hoof_echo_share * steps)
    horse += (1 - voice_echo_share) * voice + (1 - hoof_echo_share) * steps
    near = horse + clicks()
    woods = chorus() + rasping_insects() + yard(crickets(), tail_db=-3, tail_t60=.2, build_s=.02) + birds()
    return (near + woods)[None]


def record(dry, ceiling=0.71, low_cut_hz=118, top_hz=13300):
    """A small microphone rounds the highest peaks, drops the bass and cuts the top."""
    rounded = dry / (1 + (dry / ceiling) ** 8) ** (1 / 8)
    thin = signal.sosfilt(signal.butter(4, low_cut_hz, "highpass", fs=SR, output="sos"), rounded)
    return signal.sosfilt(signal.ellip(8, .2, 70, top_hz, fs=SR, output="sos"), thin)


dry = scene()
out = record(dry)
wav_record(out)
```